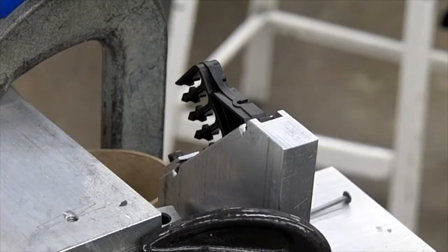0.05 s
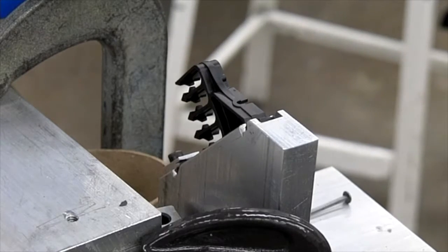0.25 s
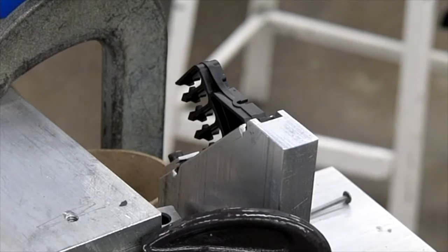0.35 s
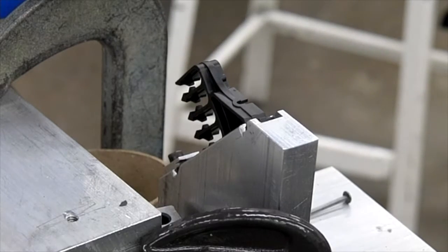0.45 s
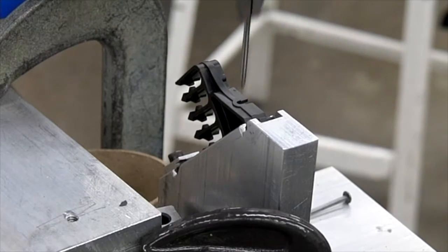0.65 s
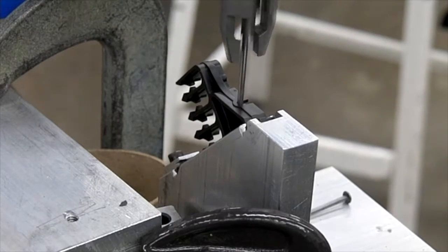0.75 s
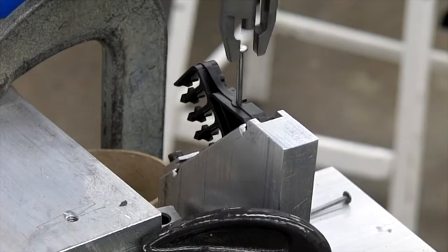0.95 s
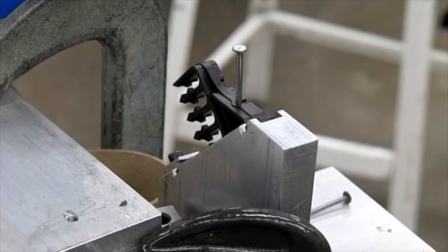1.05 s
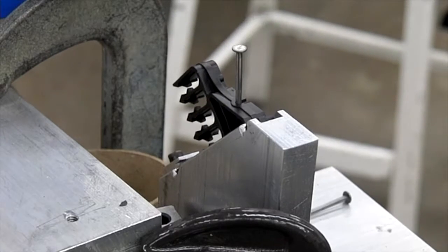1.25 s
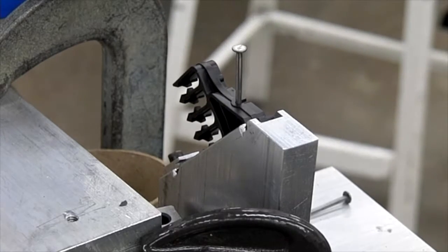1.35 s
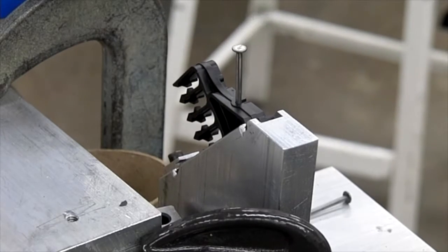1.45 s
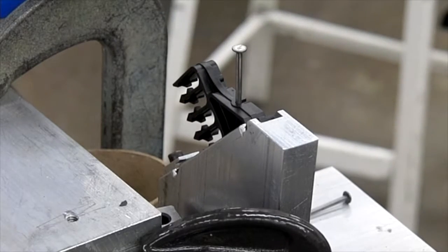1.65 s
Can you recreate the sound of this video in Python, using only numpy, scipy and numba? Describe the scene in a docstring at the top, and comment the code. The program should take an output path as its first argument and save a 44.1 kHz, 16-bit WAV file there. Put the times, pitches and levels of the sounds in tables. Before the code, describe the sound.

A pneumatic pin placer works close to the microphone over a faint workshop hum and rumble. At about 0.4 seconds a valve snaps and air hisses out, with metal knocks and gripper clatter from 0.65 to 0.9. A second snap and hiss come near 1 second, followed by more clacks and a sharp tick around 1.3. A thin high hiss fades by 1.5, leaving the hum.

```python
"""Pneumatic pin placer, close up

Close to the microphone, a placer sets a pin into a part held in a metal fixture. A valve snaps and
air vents for the down stroke and again for the return. The slide knocks against its stops and rings
the frame; the gripper clatters and ticks. Farther back in the workshop, machines hum and rumble."""
import sys
import numpy as np
from scipy import signal
from scipy.fft import rfft, irfft
from scipy.io import wavfile
from numba import njit

SR = 44100
rng = np.random.default_rng(int(sys.argv[2]) if len(sys.argv) > 2 else 0)


def generate_wav(sig):
    """Save sig (samples, or channels by samples) to the path in sys.argv[1] as 16-bit PCM at SR."""
    pcm = np.round(np.clip(np.atleast_2d(sig).T, -1, 1) * 32767).astype(np.int16)
    wavfile.write(sys.argv[1], SR, pcm)


N = 74970
T = np.arange(N) / SR
FREQS = np.maximum(np.fft.rfftfreq(2 * N, 1 / SR), 1)

# valve snaps and rebounds: start_s, level_db, body_ring_db
VALVE_SNAPS = [(0.423, 0, 1.5), (0.4321, -9, -4), (0.4411, -17, 5), (0.9622, -0.5, -4), (0.9705, -8, -8)]
# colour of a snap: freq_hz, level_db
SNAP_COLOUR = [(200, -9), (850, 6.5), (1400, -4.5), (1900, 4), (2500, -1.5), (3200, -13), (4000, -3.5),
               (5400, -19), (7300, -32), (11900, -14), (16000, -33)]
# modes of the valve body: pitch_hz, level_db, t60_s
BODY_MODES = [(953, -16, 0.021), (1837, -16.5, 0.044), (2334, -9, 0.019), (4123, -11.5, 0.022),
              (5230, -20, 0.04)]
# air vented on each stroke: open_s, close_s, level_db, sag_db_per_s, release_db_per_s
AIR_STROKES = [(0.43, 0.824, -0.5, -9.5, -150), (0.976, 1.308, -1, -2, -115)]
# colour of the air jet: freq_hz, level_db
JET_COLOUR = [(180, -35), (320, 2.5), (450, -2), (565, -12.5), (814, 0), (1410, -7), (1780, -3),
              (2480, -8.5), (3130, -13.5), (3890, -10), (5400, -16.5), (7440, -30.5), (10700, -17),
              (14500, -24.5), (16000, -36)]
# exhaust resonances and one dip: centre_hz, width_hz, gain_db
EXHAUST_BANDS = [(806, 56, 6), (1032, 97, 5), (1680, 260, 3), (2414, 74, 4), (4840, 99, -5)]
# echoes of the jet off nearby plates: delay_s, gain
PLATE_ECHOES = [(.0023, 0.18), (.0041, 0.26), (.0067, .2)]
# thin leak as the cylinder empties: time_s, level_db
LEAK_LEVEL = [(.3, -95), (.4, -68), (.6, -87), (1.218, -81), (1.29, -37.5), (1.42, -55), (1.599, -92.5)]
# soft hiss before the first stroke: time_s, level_db
SEEP_LEVEL = [(.27, -69.5), (.35, -58.5), (.42, -51.5), (.47, -65)]
# slide hitting its stops: start_s, level_db, pitch_hz, attack_s, t60_s
SLIDE_KNOCKS = [(0.6513, 1.5, 346, 0.0047, 0.048), (0.6695, -2.5, 321, 0.0029, 0.065),
                (0.8073, 5.5, 290, 0.0024, 0.043), (0.8932, -1.5, 333, 0.0029, 0.038),
                (0.9126, -14.5, 283, 0.00073, 0.026), (0.956, -2.5, 282, 0.0017, 0.02),
                (1.159, -7, 325, 0.0021, 0.026), (1.169, -11.5, 311, 0.0015, 0.044),
                (1.2389, -6, 327, 0.00091, 0.019), (1.2733, 4.5, 348, 0.0028, 0.039),
                (1.351, -3.5, 318, 0.0033, 0.028)]
# modes of the fixture frame: pitch_hz, level_db, t60_s
FRAME_MODES = [(201, -1.5, 0.076), (290, -6, 0.05), (318.2, 3.5, 0.18), (377, -3.5, 0.2), (426.2, -6, 0.28),
               (646.4, -7, 0.19), (710, -9.5, 0.15), (847, -4.5, 0.14), (1034.4, -1.5, 0.091),
               (1244, -6.5, 0.13), (1596, -9, 0.14), (1728, -12.5, 0.084), (2495, -22, 0.066)]
# clatter of gripper and guides: start_s, level_db, hold_s, t60_s
CLATTER_BURSTS = [(.656, 0, 0.0061, 0.024), (.6695, 1.5, 0.0012, 0.02), (.7968, -0.5, 0.005, 0.12),
                  (.832, -4, 0.013, 0.086), (.8938, -10.5, 0.0019, 0.058), (1.038, -4, 0.0085, 0.013),
                  (1.1572, 0.5, 0.015, 0.028), (1.2730, 2.5, 0.013, 0.085), (1.3505, -3.5, 0.0019, 0.096)]
# colour of the clattering parts: freq_hz, level_db
PARTS_COLOUR = [(200, -6.5), (400, 0.5), (700, 2), (1050, 8.5), (1400, -1.5), (1750, -2), (2400, -4),
                (3600, -13), (5500, -22.5), (7500, -29.5), (11000, -32), (16000, -41)]
# sharp steel ticks: start_s, level_db, hold_s, t60_s, tilt_db_per_octave
STEEL_TICKS = [(0.649, -14, .001, 0.024, -6), (0.6596, -0.5, 0.00049, .014, -3),
               (0.6664, 1.5, 0.0012, 0.022, -7.5), (0.794, -9.5, 0.03, 0.072, -8),
               (1.1545, -11.5, 0.00056, 0.0089, 7), (1.28, 7.5, 0.0015, 0.016, 0),
               (1.348, -16.5, 0.0023, .025, -2)]
# colour of a tick before its tilt: freq_hz, level_db
STEEL_COLOUR = [(100, -60), (1000, -23), (2500, -8.5), (3600, 0), (5400, -6), (7500, -16), (9500, -3.5),
                (11200, 7.5), (13000, -2), (16000, -3)]
# gripper jaws ringing: start_s, level_db, pitch_hz, t60_s
JAW_PINGS = [(0.658, -18.5, 2471, 0.12), (0.671, -14, 2400, 0.033), (0.671, -17, 1644, 0.087),
             (0.7995, -14.5, 1750, 0.029), (.7985, -31, 2150, 0.085), (1.161, -33, 1040, .06),
             (1.2745, -18.5, 713, 0.054), (1.351, -19, 693, 0.094)]
# motor hum across the workshop: pitch_hz, level_db
MOTOR_HUM = [(58.5, -41), (116.8, -45.5), (200.6, -44)]
# colour of the distant machines: freq_hz, level_db
RUMBLE_COLOUR = [(13, -52), (22, -9), (53, -7.5), (80, -9.5), (109, -6.5), (236, -5), (376, -9.5),
                 (496, -14), (815, -19), (1230, -24), (2590, -32), (2900, -38.5), (3610, -40),
                 (4890, -56.5), (16000, -56.5)]
# level of the background rumble, which ducks after the loud snaps and knocks: time_s, level_db
RUMBLE_LEVEL = [(0, -31.5), (.28, -29.5), (.4, -29.5), (.47, -35), (.75, -32), (1.0, -34), (1.33, -33.5),
                (1.48, -32), (1.7, -36)]
# stereo image at the microphone: freq_hz, side_over_mid_db, lean_left (-1 to 1)
STEREO_IMAGE = [(50, -15, -.3), (130, -23.5, -0.33), (300, -18.5, 0.27), (604, -3.5, -0.26),
                (1020, -4.5, -0.07), (1770, 4.5, -0.38), (4420, 10.5, .15), (7900, 6.5, -0.035),
                (11200, 13, -0.013), (14700, 4.5, 0.89)]

VALVE_DB, VALVE_HOLD_S, VALVE_T60_S = -8, 0.0024, 0.021
AIR_DB, SURGE_DB, SURGE_S, AIR_FLUTTER_DB = -27.5, 10.5, 0.021, 1.02
LEAK_HZ, LEAK_WIDTH_HZ, SEEP_HZ, SEEP_WIDTH_HZ = 10450, 780, 4080, 580
FRAME_DB, CLATTER_DB, TICK_DB, TICK_FRONT_DB = -18, -18, -20, 3.5
ROOM_DB, ROOM_T60_S, ROOM_TOP_HZ = -10, 0.67, 3000
NOTCH_HZ, NOTCH_WIDTH_HZ, NOTCH_MID_DB, NOTCH_SIDE_DB = 2870, 185, -17, -13
LIMIT_DB, LIMIT_ATTACK_S, LIMIT_RELEASE_S, LIMIT_SLOPE = -11, 0.0024, 0.14, 0.48
TOP_HZ = 16000


def valve():
    """Close to the microphone, the spool snaps over, rings the valve body and rebounds."""
    snaps = sum(undb(VALVE_DB + db) * burst(start, VALVE_HOLD_S, VALVE_T60_S)
                for start, db, _ in VALVE_SNAPS)
    crack = noise(spectrum(SNAP_COLOUR)) * snaps
    body = sum(undb(db + ring_db + mode_db) * ring(start, hz * (1 + 0.011 * rng.standard_normal()), t60)
               for start, db, ring_db in VALVE_SNAPS for hz, mode_db, t60 in BODY_MODES)
    return crack + body * np.array([[1], [.5]])  # rows: front, across


def exhaust():
    """Vented air surges, sags through the stroke and dies away; nearby plates echo the jet."""
    flow = 0
    for opens, closes, db, sag, release in AIR_STROKES:
        age = np.maximum(T - opens, 0)
        flow_db = db + SURGE_DB * np.exp(-age / SURGE_S) + sag * age
        release_db = release * np.maximum(T - closes, 0)
        flow = flow + np.clip(age / 0.002, 0, 1) * undb(flow_db + release_db)
    colour = spectrum(JET_COLOUR) + sum(db * bell(hz, width) for hz, width, db in EXHAUST_BANDS)
    jet = noise(colour) * flow * undb(AIR_DB + AIR_FLUTTER_DB * wander(43))
    echoes = sum(gain * np.exp(-2j * np.pi * FREQS * delay) for delay, gain in PLATE_ECHOES)
    return shape(jet, 1 + echoes)


def leak(hz, width_hz, levels):
    """Air hisses through one narrow gap."""
    return noise(-20 * np.log10(1 + ((FREQS - hz) / width_hz) ** 2)) * undb(curve(levels))


def slide():
    """The slide hits a stop: a short low thud, and the frame rings on, a little differently each time."""
    out = np.zeros((2, N))
    for start, db, hz, attack, t60 in SLIDE_KNOCKS:
        rise = 1 - np.exp(-np.maximum(T - start, 0) / attack)
        scatter = rng.standard_normal((len(FRAME_MODES), 3))  # two levels and a detuning per mode
        frame = sum(undb(mode_db + 2 * draw[:2, None]) * ring(start, f * (1 + 0.01 * draw[2]), decay)
                    for (f, mode_db, decay), draw in zip(FRAME_MODES, scatter))
        frame_gain = undb(FRAME_DB) * np.sqrt(t60 / 0.075)
        out += undb(db) * rise * (ring(start, hz, t60) + frame_gain * frame)
    return out


def gripper():
    """The steel jaws ring, tick and clatter as they seat and release the pin."""
    pings = sum(undb(db) * ring(start, hz, t60) for start, db, hz, t60 in JAW_PINGS)
    ticks = 0
    for start, db, hold, t60, tilt in STEEL_TICKS:
        colour = spectrum(STEEL_COLOUR) + tilt * np.log2(FREQS)
        ticks = ticks + noise(colour) * undb(TICK_DB + db) * burst(start, hold, t60)
    return clatter() + ticks * undb([[TICK_FRONT_DB], [0]]) + pings * np.array([[1], [-.5]])


def clatter():
    """Gripper and guides chatter, metal on metal, in short rough bursts."""
    grain = unit(undb(2.9 * wander(500)))
    contacts = sum(undb(CLATTER_DB + db) * burst(start, hold, t60)
                   for start, db, hold, t60 in CLATTER_BURSTS)
    return noise(spectrum(PARTS_COLOUR)) * grain * contacts


def hall(direct):
    """The hall returns a dull, diffuse tail just behind the direct sound."""
    tail = noise(-10 * np.log10(1 + (FREQS / ROOM_TOP_HZ) ** 4)) * burst(0.016, 0, ROOM_T60_S)
    response = rfft(tail, 2 * N)
    passband_rms = np.sqrt(np.mean(abs(response[:, FREQS < ROOM_TOP_HZ / 2]) ** 2))
    return undb(ROOM_DB) * shape(direct, response / passband_rms)


def workshop(waver_db=4):
    """Well back from the microphone, motor hum wavers in the rumble of distant machines."""
    hum = 0
    for hz, db in MOTOR_HUM:
        amplitude = np.sqrt(2) * undb(db + waver_db * wander(5.9))
        hum = hum + amplitude * np.sin(2 * np.pi * hz * T + 0.56 * wander(1.6))
    return hum + noise(spectrum(RUMBLE_COLOUR)) * undb(curve(RUMBLE_LEVEL))


def undb(db):
    """Decibels to gain."""
    return 10 ** (np.asarray(db) / 20)


def unit(x):
    """Scale to rms 1."""
    return x / np.sqrt(np.mean(x ** 2))


def curve(rows):
    """Join (time_s, value) points with straight lines."""
    return np.interp(T, *np.array(rows, float).T)


def spectrum(rows, column=1):
    """One column of a (freq_hz, ...) table at every frequency."""
    rows = np.array(rows, float)
    return np.interp(np.log(FREQS), np.log(rows[:, 0]), rows[:, column])


def bell(hz, width_hz):
    """A bump of height 1 on the frequency axis."""
    return np.exp(-((FREQS - hz) / width_hz) ** 2)


def shape(x, gain):
    """Filter by a gain at every frequency."""
    return irfft(rfft(x, 2 * N) * gain)[..., :N]


def noise(colour_db):
    """Two unrelated noises of one colour, rms 1."""
    return unit(shape(rng.standard_normal((2, N)), undb(colour_db)))


def wander(rate_hz):
    """Smooth random motion, rms 1."""
    return unit(shape(rng.standard_normal(N), bell(0, rate_hz)))


def burst(start, hold, t60):
    """Near-instant attack, hold, exponential release."""
    age = T - start
    return np.clip(age / 0.00032, 0, 1) * np.exp(-np.log(1000) * np.maximum(age - hold, 0) / t60)


def ring(start, hz, t60):
    """One struck mode."""
    age = np.maximum(T - start, 0)
    return -np.sin(2 * np.pi * hz * age) * np.exp(-np.log(1000) * age / t60)


@njit
def follow(x, attack, release):
    """Track a level with separate rates for rise and fall."""
    out, level = np.empty(len(x)), 0.
    for i in range(len(x)):
        level += (x[i] - level) * (attack if x[i] > level else release)
        out[i] = level
    return out


def scene():
    """Placer up close, workshop behind: bass centred, treble very wide, a narrow presence dip."""
    placer = valve() + leak(LEAK_HZ, LEAK_WIDTH_HZ, LEAK_LEVEL) + leak(SEEP_HZ, SEEP_WIDTH_HZ, SEEP_LEVEL)
    placer += exhaust() + slide() + gripper()
    front, across = placer + hall(placer) + workshop()
    dip = bell(NOTCH_HZ, NOTCH_WIDTH_HZ)
    width = undb(spectrum(STEREO_IMAGE) + NOTCH_SIDE_DB * dip)
    lean = np.clip(spectrum(STEREO_IMAGE, column=2), -.9, .9)
    mid = shape(front, undb(NOTCH_MID_DB * dip))
    side = shape(front, width * lean) + shape(across, width * np.sqrt(1 - lean ** 2))
    return np.array([mid + side, mid - side])


def record(dry):
    """A limiter ducks after the loudest blows, the sharpest peaks clip and the top is cut."""
    level = follow(abs(dry).max(axis=0), 1 / (LIMIT_ATTACK_S * SR), 1 / (LIMIT_RELEASE_S * SR))
    limited = dry * np.maximum(level / undb(LIMIT_DB), 1) ** -LIMIT_SLOPE
    lowpass = signal.ellip(12, .2, 80, TOP_HZ, fs=SR, output="sos")
    return signal.sosfilt(lowpass, np.clip(limited, -1, 1))


dry = scene()
out = record(dry)
generate_wav(out)
```